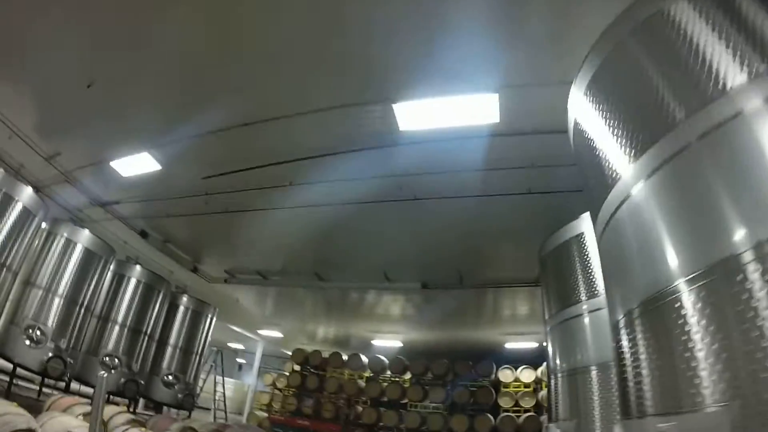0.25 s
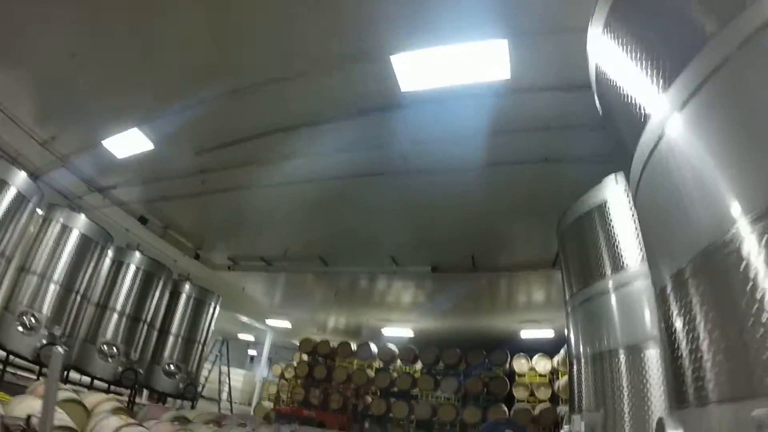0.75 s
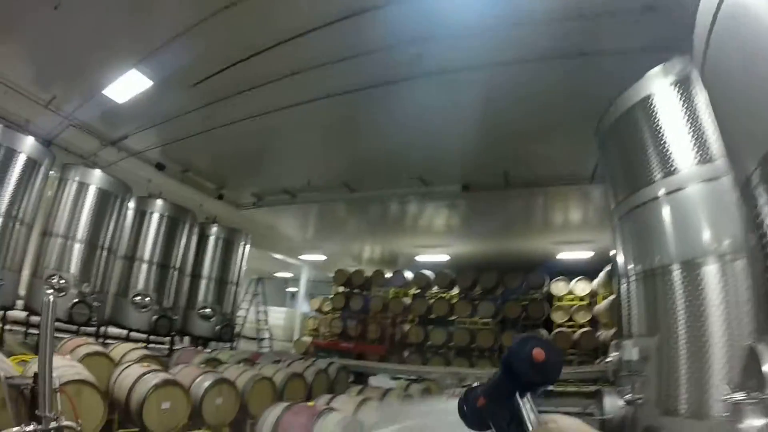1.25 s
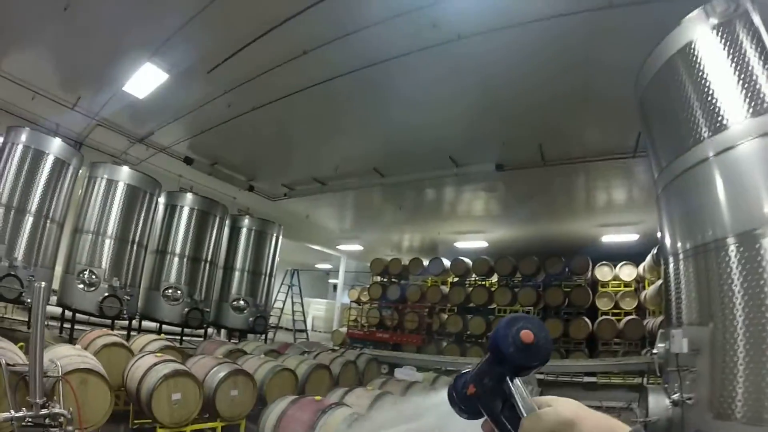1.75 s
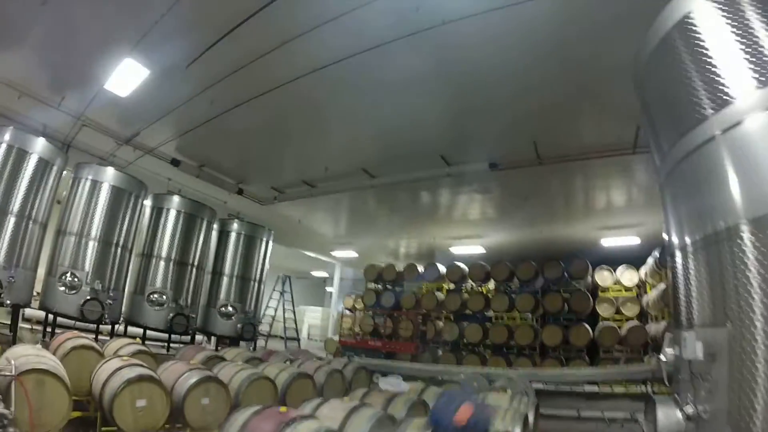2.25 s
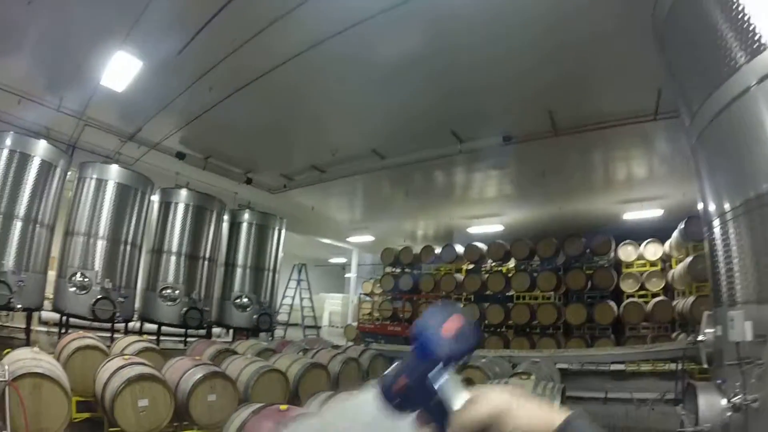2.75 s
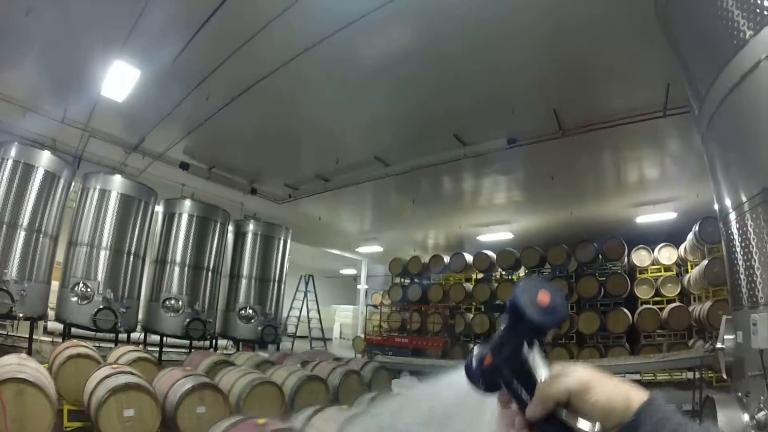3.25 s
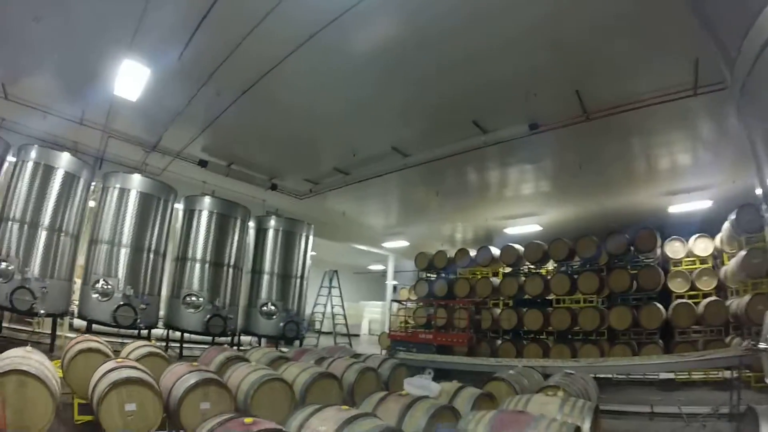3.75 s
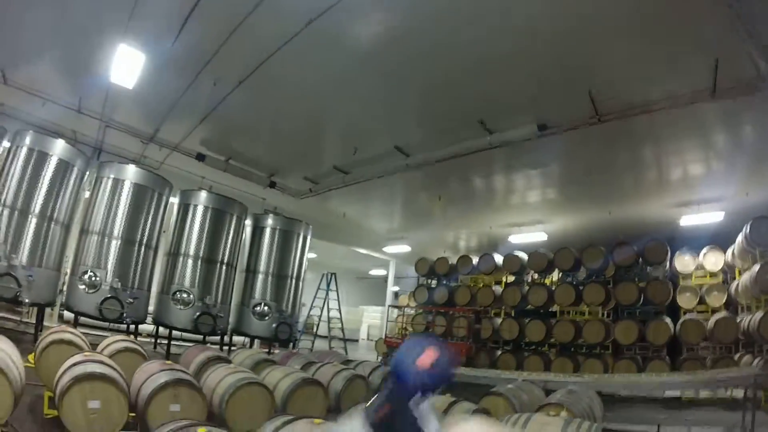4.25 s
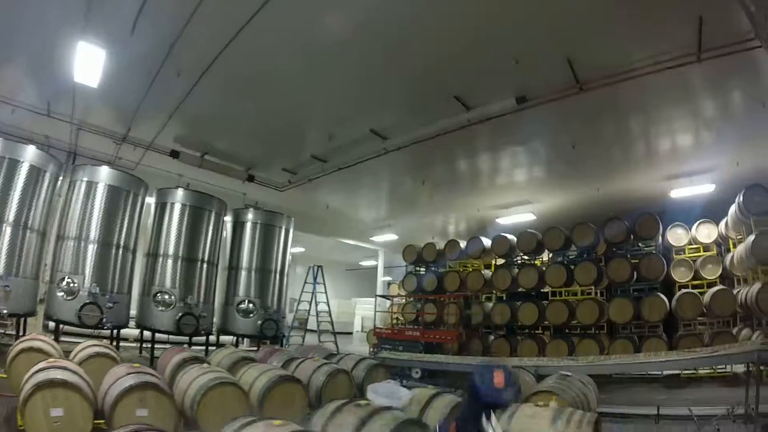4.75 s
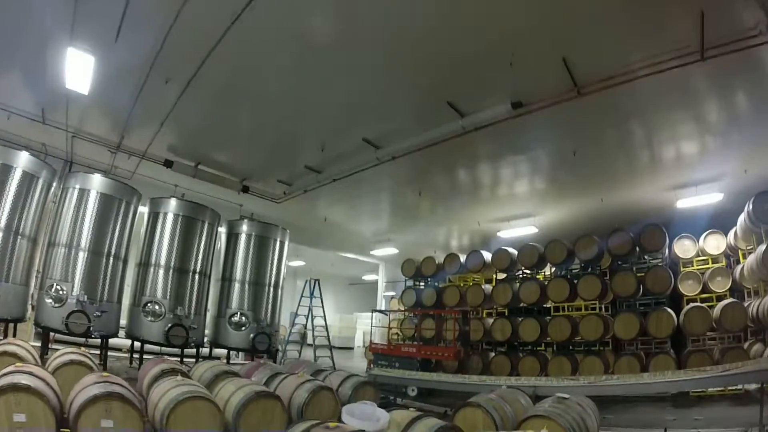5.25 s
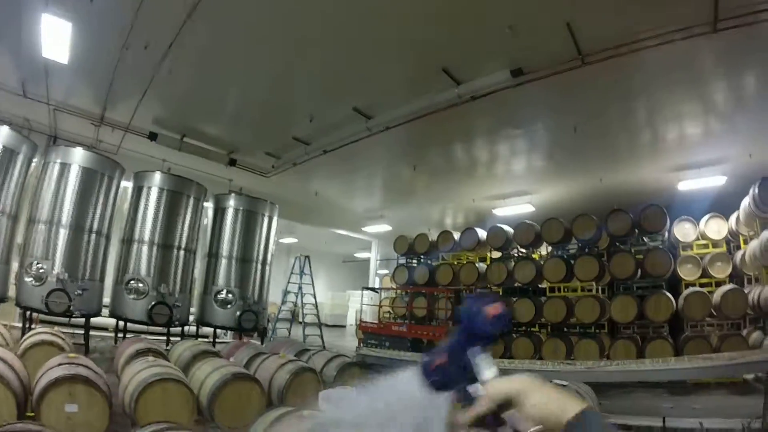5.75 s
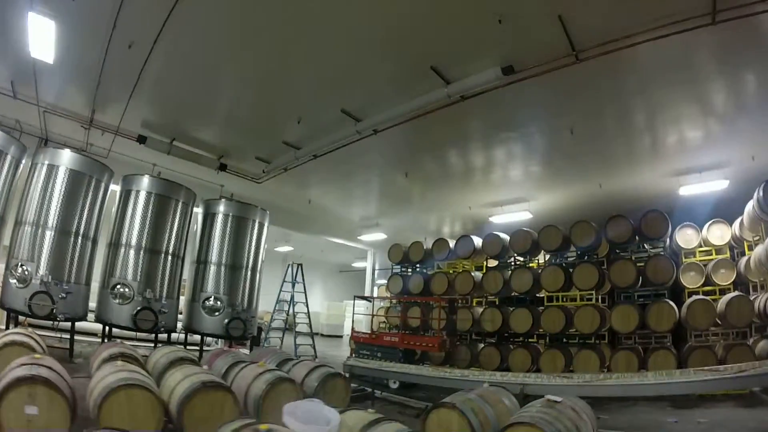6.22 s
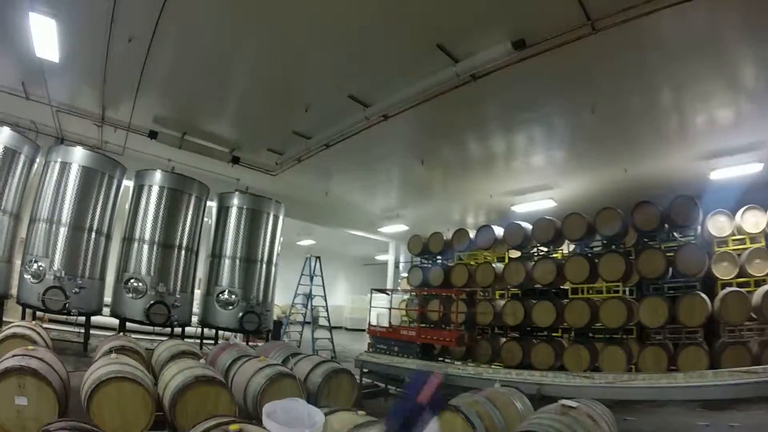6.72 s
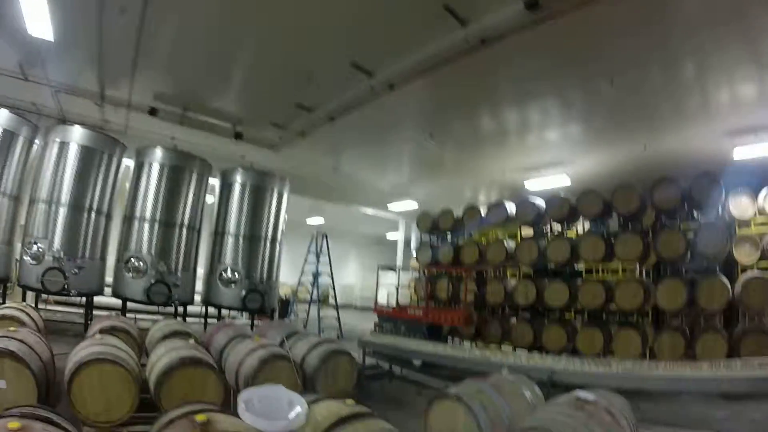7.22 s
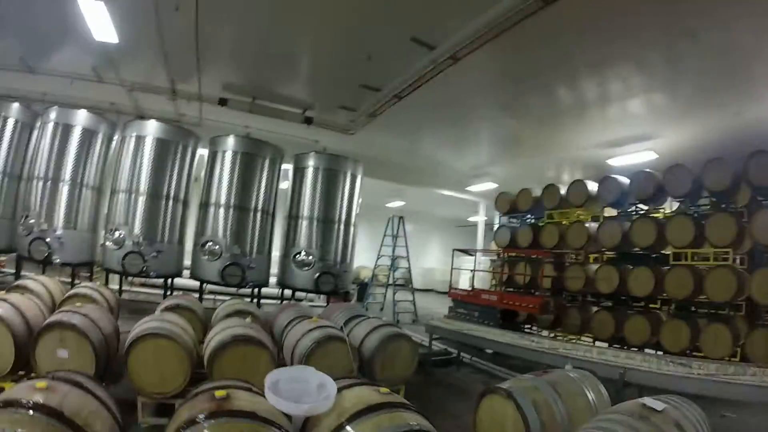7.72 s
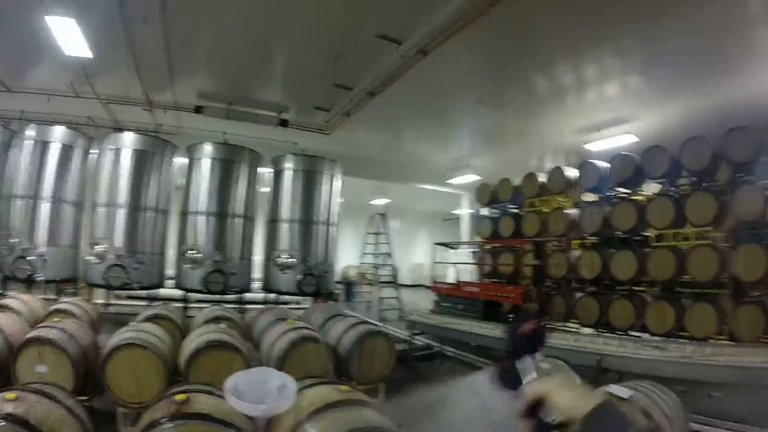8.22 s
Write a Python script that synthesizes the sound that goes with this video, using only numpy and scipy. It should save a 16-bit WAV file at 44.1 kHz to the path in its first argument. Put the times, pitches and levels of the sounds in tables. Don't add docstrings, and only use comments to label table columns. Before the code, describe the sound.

A steady, muffled hiss of water spraying from a hose gun over barrels in a cellar, gently swelling, with soft mount bumps and small plastic ticks.

```python
import sys
import numpy as np
from scipy import signal
from scipy.fft import rfft, irfft, next_fast_len
from scipy.io import wavfile
from scipy.ndimage import uniform_filter1d

SR = 44100
rng = np.random.default_rng(int(sys.argv[2]) if len(sys.argv) > 2 else 0)


def unload_wav(signal):
    wavfile.write(
        sys.argv[1],
        SR,
        np.round(np.clip(np.atleast_2d(signal).T, -1, 1) * 32767).astype(np.int16),
    )


def invert_db(x):
    u = np.asarray(x, float) / 20
    return 10 ** u


N = 373968
SIZE = next_fast_len(N)
HZ = np.arange(SIZE // 2 + 1) * SR / SIZE
T = np.arange(N) / SR

# centre in Hz, then dB per dB of nearness,
# of raised gun and of mist.
HISS_PARTS = [(1560, 0.68, 0.23, -0.047), (1970, 1.48, 0.55, -0.32), (3040, 0.58, -0.67, 0.11),
              (4260, 0.79, 0.93, -0.028), (4900, 0.43, 0.37, 0.37), (6400, 0.39, 0.11, 0.28),
              (8300, 0.077, -0.25, 0.83), (12400, 0.31, 0.89, .7)]
# frequency in Hz, density in dB per Hz.
WALL_OUTLINE = [(650, -30.5), (1100, -21), (1530, -18), (1710, -11.5), (2320, -5), (2610, -1.5), (3400, -3),
                (4370, -1.5), (5160, -5.5), (5690, -4.5), (7730, -17), (12400, -25.5), (15100, -33)]
# centre in Hz, width in Hz, gain in dB.
HOUSING_MODES = [(1524, 212, 10.5), (1760, 310, -3.5), (2170, 130, 2), (2323, 88, -9.5), (2705, 260, 2.5),
                 (2966, 67, -4.5), (3150, 360, 3), (3300, 83, -4), (3830, 210, 2), (4412, 280, 5),
                 (4740, 64, -2), (4830, 90, 0.5), (5290, 275, -6.5), (5450, 190, 4), (6340, 270, 3.5),
                 (7680, 320, -4), (8440, 240, 0.5), (10300, 690, 3), (11600, 400, -1.5), (12150, 490, 4),
                 (13300, 800, 1.5)]
# time in seconds, nearness in dB, mist in dB.
FAN_PATH = [(0, -3.5, -4), (.8, -5, -1.5), (1.3, -4.5, 1), (1.62, -.5, 2.5), (1.72, -0.5, -2),
            (2.3, 2.5, -1.5), (2.75, 3.5, -2.5), (3.3, 3, -1), (3.75, 2.3, -1), (5.0, 1.5, 0.1),
            (5.6, 3, 0.5), (5.98, 1, 1), (6.06, -1.5, -0.5), (6.7, -2.5, 2.1), (7.2, -3.5, -.6),
            (7.45, -1.5, .6), (7.9, -0.8, 3.5), (8.48, -4.5, -1)]
# centre in seconds, length in seconds, rise in dB.
GUN_RAISES = [
    (1.5, 0.58, 3),
    (1.95, .3, 2),
    (2.95, 0.36, 3),
    (3.25, 0.33, 3),
    (4.55, .55, 4.5),
    (5.9, 0.31, 3.5),
    (6.85, .22, 1),
    (8.0, .3, 0.5),
    (8.38, .2, 2),
]
# centre in seconds, length in seconds, gain in dB, pitch in Hz.
HISS_SWELLS = [(.15, 0.56, 4, 3170), (.85, 0.45, 3, 6500), (1.822, .12, 6.5, 2380),
               (2.498, .35, 5, 3240), (2.6, .3, 2.5, 6700), (2.65, 0.3, 4, 2670),
               (3.15, .3, 1.5, 5200), (3.2, .4, 1.5, 4300), (1.95, .5, 1.5, 4200),
               (4.7, 0.24, 0.5, 4300), (.3, .6, 2.5, 8000), (3.0, .4, 2.5, 2000), (4.6, .5, 2, 2000),
               (7.65, .4, 2.5, 2100), (4.0, 0.42, 2, 3300), (4.79, 0.36, 3, 2670),
               (5.3, 0.52, 2.5, 3300), (5.3, .6, 1.5, 6900), (5.62, 0.43, 4, 2670),
               (5.93, .25, 3.5, 5700), (5.968, .1, 4, 2670), (6.35, 0.43, 3, 3040),
               (6.6, 0.23, 3.5, 10000), (6.75, 0.18, 2, 6760), (7.43, 0.14, 4, 4400),
               (7.598, .25, 4.5, 3300), (7.795, 0.27, 4.5, 2620), (7.8, .2, 5.5, 7800),
               (7.95, 0.12, 5.5, 3570), (7.95, .2, 3, 10000)]
# time in seconds, lag in ms.
ARM_LAGS = [(0, .57), (.8, 0.5), (1.1, .55), (2.25, 0.51), (2.6, .6), (2.95, 0.54), (3.4, 0.57), (4.5, 0.5),
            (5.5, .62), (6.1, 0.544), (7, .48), (7.5, 0.58), (7.9, .53), (8.48, .53)]
# lag in ms, level in dB.
BARREL_ECHOES = [(1.6, -22), (3.9, -14.5), (6.1, -21.5), (9.4, -18), (14.5, -16.5)]
# peak in seconds, level in dB, length in seconds.
MOUNT_JOLTS = [(0.143, -45, 0.055), (0.357, -35, 0.15), (0.635, -42, 0.04), (.8, -37, 0.11),
               (.95, -39.5, 0.17), (1.103, -38.5, 0.093), (1.33, -45, 0.13), (1.563, -39, 0.039),
               (1.73, -42.5, 0.13), (1.97, -45.5, 0.12), (2.32, -35, 0.1), (2.507, -41, 0.057),
               (3.28, -46.5, 0.13), (3.58, -50.5, 0.16), (4.17, -44.5, 0.19), (4.713, -53.5, .3),
               (5.106, -49, 0.056), (5.58, -41.5, 0.075), (6.0, -59, 0.11), (6.3, -47.5, .18),
               (7.024, -48, 0.066), (7.17, -46, 0.1), (7.7, -50.5, 0.18), (8.1, -57, .2), (8.32, -44, .08),
               (8.48, -47, .05)]
# start in seconds, level in dB, pitch in Hz, T60 in seconds.
MOUNT_THUMPS = [(.405, -40, 135, 0.083), (0.602, -47, 125, 0.14), (.797, -39, 110, 0.062),
                (0.932, -35, 114, 0.085), (1.269, -46, 160, .08), (1.91, -40.5, 70, .12),
                (4.655, -42, 85, .1), (6.75, -46, 100, .1), (7.93, -46, 135, .08),
                (2.4228, -21, 112, 0.051), (2.5, -32, 103, 0.08), (3.24, -39.5, 60, 0.14),
                (4.241, -32, 103, 0.092), (4.305, -42.5, 140, 0.085), (5.66, -30.5, 97, 0.1),
                (6.122, -41, 140, 0.11), (6.466, -42, 105, 0.064), (7.175, -42, 141, 0.11),
                (7.325, -38, 100, 0.077), (7.733, -42.5, 121, 0.1)]
# start in seconds, level in dB, sharpness 0 to 1.
SHELL_TICKS = [
    (.6045, -37.5, 0),
    (.799, -44, 0.3),
    (4.3096, -36, 0.4),
    (6.1205, -25.5, 0.9),
    (7.1744, -25.5, 1),
    (8.4737, -27, 0.94),
]
# frequency in Hz, level in dB, T60 in seconds.
SHELL_MODES = [(886, -8, 0.027), (1570, -3, 0.016), (1780, -1, 0.008), (477, -19, 0.01), (1230, -14, 0.013)]
# frequency in Hz, density in dB per Hz.
FLOOR_OUTLINE = [(18, -30), (30, 0), (190, -7.5), (419, -11.5), (673, -13.5), (1030, -13.5), (1140, -16),
                 (1480, -13), (2000, -18), (2600, -2.5), (4400, -120)]
# centre in seconds, low edge in Hz, high edge in Hz.
BAND_SPLITS = [(.204, 7600, 9000), (.204, 9700, 11000), (1.853, 5200, 6400), (2.016, 9000, 10400),
               (2.828, 5200, 7000), (2.828, 7600, 9000), (3.92, 5200, 6300), (4.895, 8300, 9700),
               (5.104, 9000, 10400), (6.823, 5200, 6400), (7.124, 5700, 8300), (8.052, 8300, 9700),
               (8.286, 5200, 6400), (8.286, 13200, 14500)]


def spray():
    level_db, drops_db = -42, 0.72
    bumps_db = sum(db / (1 + (2 * (HZ - hz) / width_hz) ** 2) for hz, width_hz, db in HOUSING_MODES)
    noise = irfft(coloured(invert_db(shape(WALL_OUTLINE) + bumps_db), 2400, 5000), SIZE)[:N]
    drop_times = T[::48]
    noise *= invert_db(drops_db * np.interp(T, drop_times, rng.standard_normal(len(drop_times))))

    hz, t, cells = signal.stft(noise, SR, nperseg=512, noverlap=384)
    raised_db = sum(db * bell(t, s, length_s) for s, length_s, db in GUN_RAISES)
    gain_db = level_db + fan_db(hz, t, raised_db) + swells_db(hz, t) + drift_db(hz, t)
    cells = cells * invert_db(gain_db) * arm_gain(hz, t, raised_db)
    return signal.istft(cells, SR, nperseg=512, noverlap=384)[1][:N]


def fan_db(hz, t, raised_db):
    s, near_db, mist_db = np.transpose(FAN_PATH)
    controls_db = [np.interp(t, s, near_db), raised_db, np.interp(t, s, mist_db)]
    parts = np.array(HISS_PARTS)
    return spread(parts[:, 1:] @ controls_db, parts[:, 0], hz)


def swells_db(hz, t, width_octaves=0.29):
    octaves = np.log2(hz + 1)
    return sum(db * np.outer(bell(octaves, np.log2(pitch_hz), width_octaves), bell(t, s, length_s))
               for s, length_s, db, pitch_hz in HISS_SWELLS)


def drift_db(hz, t, patchy_db=0.86, flicker_db=0.5, gust_db=0.5):
    patches = patchy_db * walk(t, 3, count=70) + flicker_db * walk(t, 14, count=70)
    return spread(patches, np.linspace(1100, 15500, 70), hz) + gust_db * walk(t, 12, count=1)


def arm_gain(hz, t, raised_db, share=0.097, share_per_db=-0.3):
    lag_ms = np.interp(t, *np.transpose(ARM_LAGS))
    reflected = np.outer(np.clip(hz / 8000, 0, 1), np.clip(share + share_per_db * raised_db, 0, 0.2))
    echo = 1 + reflected * np.exp(-2j * np.pi * np.outer(hz, lag_ms) / 1000)
    return np.abs(echo) / np.sqrt(1 + reflected ** 2)


def barrels(x, wander_ms=0.396):
    knots_s = T[::256]
    out = x.copy()
    for (lag_ms, db), wander in zip(BARREL_ECHOES, walk(knots_s, 1.5, count=5)):
        path_ms = lag_ms + wander_ms * np.interp(T, knots_s, wander)
        out += invert_db(db) * np.interp(T - path_ms / 1000, T, x)
    return out


def sway():
    sway_hz, width_hz, still_db = 14, 14.2, -61
    band = 1 / (1 + (2 * (HZ - sway_hz) / width_hz) ** 4) * (HZ > 5)
    swing = irfft(coloured(band, 8, 35), SIZE)[:N]
    swing /= np.sqrt(uniform_filter1d(swing ** 2, size=4000) + 0.034)
    jolts = sum(invert_db(2 * db) * bell(T, s, length_s) for s, db, length_s in MOUNT_JOLTS)
    shaking_db = 10 * np.log10(invert_db(2 * still_db) + jolts)
    rub = irfft(coloured(1 / (1 + ((HZ - 60) / 55) ** 4), 30, 150), SIZE)[:N]
    return invert_db(shaking_db) * swing + invert_db(0.68 * shaking_db - 38) * rub


def thumps():
    out = np.zeros(N)
    for s, db, hz, t60_s in MOUNT_THUMPS:
        add(out, s, invert_db(db) * ring(hz, t60_s, rise_s=0.0041))
    return out


def ticks():
    out = np.zeros(N)
    no_bass = signal.butter(1, 350, "high", fs=SR)
    for s, db, sharpness in SHELL_TICKS:
        tick = 0
        for hz, mode_db, t60_s in SHELL_MODES:
            softness_db = 22.0 * (1 - sharpness) * np.log2(hz / 870)
            tick = tick + invert_db(db + mode_db - softness_db) * ring(hz, t60_s, rise_s=0.0001)
        add(out, s, signal.lfilter(*no_bass, tick))
    return out


def floor(level_db=-60.5):
    return invert_db(level_db) * irfft(coloured(invert_db(shape(FLOOR_OUTLINE)), 180, 993), SIZE)[:N]


def split_bands(water, level_db=-2.0):
    side = np.zeros(N)
    span = 2048
    hz = np.arange(span // 2 + 1) * SR / span
    fade = np.cos(np.pi * np.clip((np.arange(span) / span - 0.5) * 1.23, -0.5, 0.5))
    for s, low_hz, high_hz in BAND_SPLITS:
        i = int(s * SR) - span
        band = rfft(water[i - span:i]) * (hz > low_hz) * (hz < high_hz)
        add(side, s - span / 2 / SR, invert_db(level_db) * fade * irfft(band))
    return side


def shape(points):
    hz, db = np.transpose(points)
    return np.interp(np.log(HZ + 1), np.log(hz), db)


def coloured(gain, low_hz, high_hz):
    x = gain * rfft(rng.standard_normal(SIZE))
    band = x[(HZ > low_hz) & (HZ < high_hz)]
    return x / np.sqrt(2 * np.sum(np.abs(band) ** 2)) * SIZE


def walk(t, rate_hz, count):
    knots = rng.standard_normal((count, int(rate_hz * 9) + 3))
    k = (t * rate_hz).astype(int)
    ease = np.sin(np.pi / 2 * (t * rate_hz - k)) ** 2
    return 1.15 * (knots[:, k] * (1 - ease) + knots[:, k + 1] * ease)


def spread(rows, centres_hz, hz):
    weights = [np.interp(np.log(hz + 1), np.log(centres_hz), e) for e in np.eye(len(centres_hz))]
    return np.transpose(weights) @ rows


def bell(x, centre, width):
    return np.exp(-np.log(2) * (2 * (x - centre) / width) ** 2)


def ring(hz, t60_s, rise_s):
    t = T[:SR // 4]
    return (1 - np.exp(-t / rise_s)) * np.exp(-np.log(1000) * t / t60_s) * np.sin(2 * np.pi * hz * t)


def add(out, s, x):
    i = int(s * SR)
    out[i:i + len(x)] += x[:len(out) - i]


def scene():
    water = barrels(spray())
    mono = water + sway() + thumps() + ticks() + floor()
    side = split_bands(water)
    return np.array([mono + side, mono - side])


def roll_off(x):
    return signal.sosfilt(signal.butter(12, 15240, fs=SR, output="sos"), x)


def record(dry):
    return roll_off(dry)


dry = scene()
out = record(dry)
unload_wav(out)
```